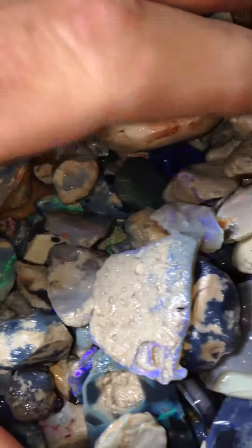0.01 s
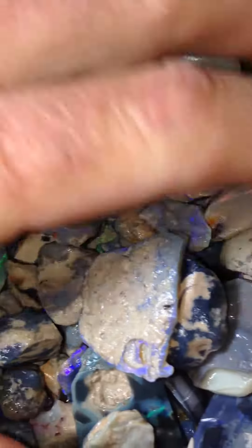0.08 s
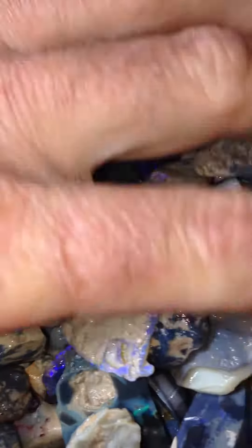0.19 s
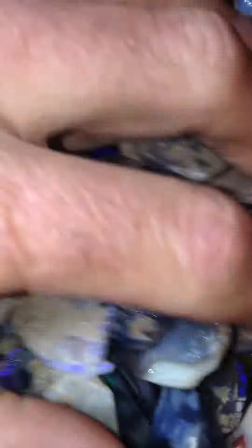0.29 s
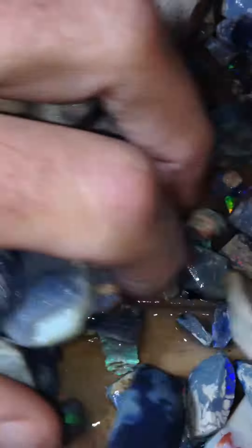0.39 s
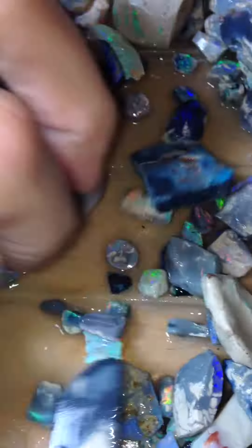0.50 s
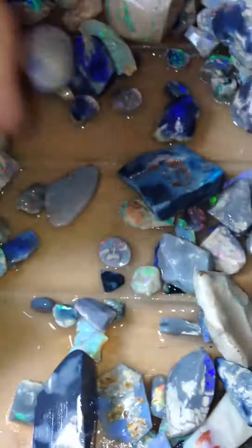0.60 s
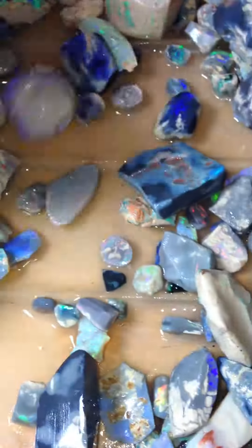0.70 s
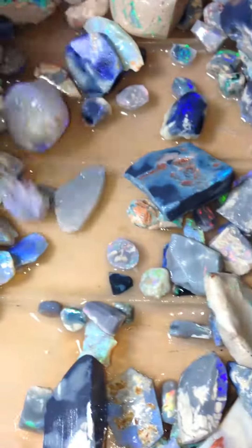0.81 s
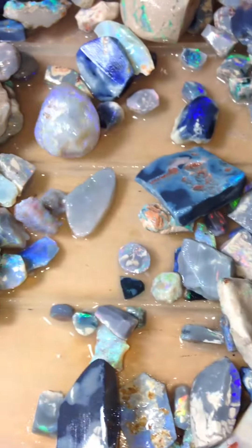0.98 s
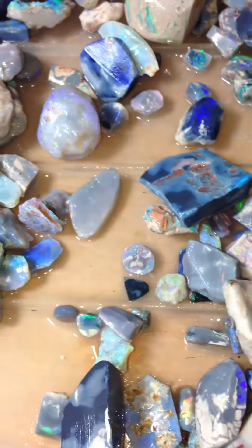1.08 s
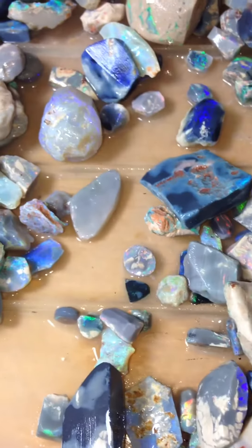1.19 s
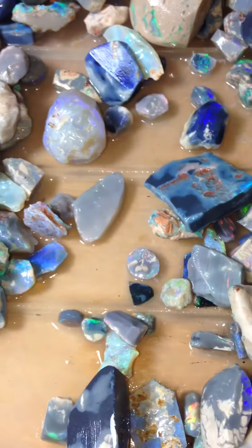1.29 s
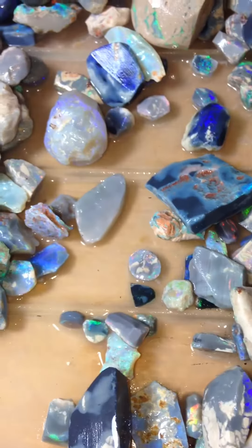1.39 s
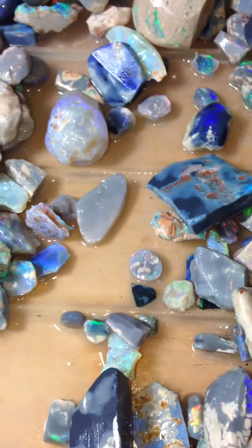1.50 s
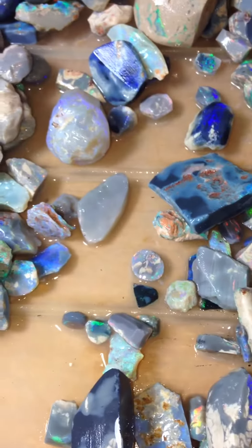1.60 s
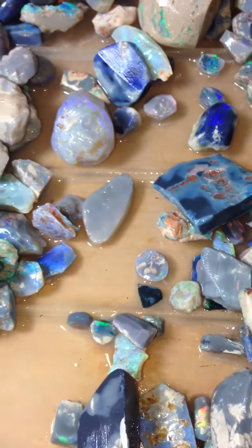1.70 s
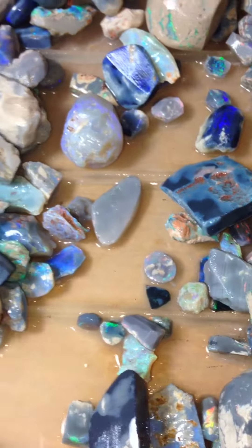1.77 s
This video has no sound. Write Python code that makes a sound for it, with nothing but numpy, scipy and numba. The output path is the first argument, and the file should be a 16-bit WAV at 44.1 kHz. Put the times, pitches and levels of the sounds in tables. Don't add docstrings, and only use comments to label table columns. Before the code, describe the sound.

Small hard stones clatter in a shallow tray, raked by hand, very close and fairly dry indoors. Faint rustling and ticks until 0.2 s, then a push swells into a dense, hard rattle at 0.35-0.6 s. Loose stones tumble on, with bright sharp clacks around 0.93-1.1 s, tiny high glassy rings and dull tray knocks. Sparser clicks follow, with a small flurry near 1.5 s, over faint room air and hum.

```python
import sys
import numpy as np
from scipy import signal
from scipy.fft import rfft, irfft
from scipy.io import wavfile
from scipy.ndimage import map_coordinates
from numba import njit

SR = 44100
rng = np.random.default_rng(int(sys.argv[2]) if len(sys.argv) > 2 else 0)


def nominal_scale(level):
    x = np.asarray(level, float) / 20
    return 10 ** x


def unload_audio(sound):
    columns = np.transpose(np.atleast_2d(sound))
    steps = np.round(np.clip(columns, -1, 1) * 32767)
    wavfile.write(sys.argv[1], SR, steps.astype(np.int16))


N = 79380

# (pitch [Hz], level [dB], time to fade 60 dB [s])
TRAY_MODES = [(131.8, -17.5, 0.17), (171.5, -19.5, 0.42), (280, -6, 0.021), (423, -11.5, 0.24),
              (596.5, -10.5, 0.19), (828, -2.5, 0.1), (1114, 4, 0.019), (1547, -4.5, 0.11),
              (1817, 5.5, 0.023)]
# (time [s], pitch [Hz], boost [dB])
PALM_HOLLOW = [(0, 1025, 10), (.2, 1010, 12.5), (.25, 1130, 16.5), (.29, 1580, 4.5), (.45, 1340, 11),
               (.55, 1180, 5.5), (.66, 900, 4)]
TRAY_DRIFT = 0.079
STONE_CYCLES, CYCLES_SCATTER = 26, 0.45


def unit(x):
    return x / np.sqrt(np.mean(x ** 2))


def read(table, hz):
    table = np.array(table)
    return np.interp(np.log(hz), np.log(table[:, 0]), table[:, 1])


@njit
def ring(at, hz, t60, size):
    out = np.zeros(N)
    for k in range(len(at)):
        turn = np.exp(2j * np.pi * hz[k] / SR - np.log(1000.) / (t60[k] * SR))
        z = size[k] + 0j
        start = max(int(at[k] * SR), 0)
        for j in range(start, min(start + int(t60[k] * SR), N)):
            out[j] += z.imag
            z *= turn
    return out


def strike(at, size, modes, drift=TRAY_DRIFT):
    hz, db, t60 = np.array(modes, float).T
    chance = rng.standard_normal((len(at), 2, len(hz)))
    mode_hz = hz * (1 + drift * chance[:, 0])
    mode_size = size[:, None] * nominal_scale(db + 1.46 * chance[:, 1])
    rows = np.broadcast_arrays(at[:, None], mode_hz, t60, mode_size)
    return ring(*(np.ascontiguousarray(r).ravel() for r in rows))


def walk(rate_hz):
    steps = rng.standard_normal(1000)
    return np.interp(np.arange(N) / SR * rate_hz, np.arange(len(steps)), steps)


def rustle():
    contacts = 7000
    clump_hz, clump_db = 91, 0.14
    ticks_db, drum_db = -1, -12
    dull_hz, soft_dull = 9000, 0.64
    palm_damp = 0.34
    # (pitch [Hz], level [dB])
    stones = [(700, 2), (1400, -4.5), (2200, -0.5), (3000, 2), (4200, -1), (5800, -0.6), (8500, -3),
              (15000, -12)]

    at = rng.random(contacts) * N / SR
    push_db, tilt_db, scatter_db = effort(at)
    steady = np.sqrt(np.mean(nominal_scale(push_db) ** 2))
    db = push_db + clump_db * walk(clump_hz)[(at * SR).astype(int)]
    db = db + scatter_db * (np.minimum(rng.exponential(size=contacts), 3.4) - 1.3)

    hz = 700 * (15500 / 700) ** rng.random((contacts, 3))
    t60 = STONE_CYCLES / hz * np.exp(CYCLES_SCATTER * rng.standard_normal(hz.shape))
    mode_db = db[:, None] + read(stones, hz) + patches(at, hz)
    mode_db = mode_db + tilt_db[:, None] * np.log2(hz / 2000)
    gentle_db = np.minimum(push_db + 10, 0)[:, None]
    mode_db = mode_db + soft_dull * gentle_db * np.maximum(np.log2(hz / dull_hz), 0)
    size = nominal_scale(mode_db) * np.sqrt(hz / t60)
    ticks = ring(np.repeat(at, 3), hz.ravel(), t60.ravel(), size.ravel())
    ticks = signal.sosfilt(signal.butter(2, 480, "high", fs=SR, output="sos"), ticks)

    s, _, palm_db = np.array(PALM_HOLLOW).T
    tap_db = db - palm_damp * np.interp(at, s, palm_db)
    taps = contacts // 5
    drum = strike(at[:taps], nominal_scale(tap_db[:taps]) * rng.choice([-1., 1.], taps), TRAY_MODES)
    return steady * (nominal_scale(ticks_db) * unit(ticks) + nominal_scale(drum_db) * unit(drum))


def effort(at):
    edge_s = 0.0062
    push_scatter_db, tumble_scatter_db = -1, -0.5
    # (time [s], level [dB], brightness [dB per octave])
    push = [(0, -31.5, -4.5), (0.042, -27.5, -1), (0.097, -26.5, -2), (.135, -43, -2.5), (.18, -41, -3),
            (.21, -25.5, 0), (0.345, -20, -3), (0.368, -11, 0.7), (.5, -13, 2.1), (.58, -17, -0.1),
            (.71, -24, 0.7), (.8, -22.5, 1.8), (1.04, -29, 2.5), (1.13, -26, 1.8), (1.27, -30.5, -3),
            (1.39, -39.5, -3), (1.46, -28.5, -0.3), (1.8, -32.5, -3.5)]
    # (start [s], length [s], level [dB], brightness [dB per octave])
    tumbles = [(0.243, 0.022, -20, -0.5), (0.301, 0.0091, -20.5, 3.5), (0.349, 0.0087, -16, 3),
               (0.37, 0.02, -19, 4), (0.427, 0.022, -16.5, -2), (0.199, 0.0075, -32, -5),
               (0.331, 0.011, -25.5, 13), (0.617, 0.015, -18, 1.5), (0.778, 0.026, -24.5, -0.5),
               (0.875, 0.011, -25, 4.5), (0.915, 0.004, -27, 7), (0.932, 0.0056, -24, -3),
               (0.945, 0.035, -22, 2.5), (0.997, 0.011, -17.5, -1), (1.02, 0.039, -21.5, 1.2),
               (1.082, 0.021, -21, -2.5), (1.146, 0.01, -24, 0.5), (1.164, 0.0097, -20.5, 0.8),
               (1.196, 0.017, -31, 9.5), (1.227, 0.0086, -25.5, 0.7), (1.332, 0.012, -29, -4.5),
               (1.442, 0.0042, -24, -2), (1.458, 0.015, -29, 2.5), (1.482, 0.005, -27, 2.5),
               (1.522, 0.034, -24, 0.8), (1.592, 0.023, -29.5, -1.5), (1.663, 0.0087, -23.5, -4),
               (1.77, 0.012, -27, -3)]

    s, push_db, push_tilt_db = np.array(push, float).T
    power = nominal_scale(np.interp(at, s, push_db)) ** 2
    tilt_db = np.interp(at, s, push_tilt_db) * power
    scatter_db = push_scatter_db * power
    for start, length, tumble_db, tumble_tilt_db in tumbles:
        rise = (at - start) / edge_s + 1
        fall = (start + length - at) / edge_s / 2 + 1
        extra = (nominal_scale(tumble_db) * np.clip(np.minimum(rise, fall), 0, 1)) ** 2
        power = power + extra
        tilt_db = tilt_db + extra * tumble_tilt_db
        scatter_db = scatter_db + extra * tumble_scatter_db
    return 10 * np.log10(power), tilt_db / power, np.clip(scatter_db / power, 0, 6)


def patches(at, hz):
    patch_hz, patch_db = 22.34, 0.54
    palm_octaves, group_octaves = 0.29, 0.12
    # (middle [s], length [s], pitch [Hz], boost [dB])
    grinds = [(0.4, 0.039, 2400, 1), (0.392, 0.014, 2000, -3), (0.45, 0.05, 8100, 2.5),
              (0.364, 0.026, 1200, 1), (0.498, 0.018, 1160, 7.5), (0.488, 0.033, 3140, 5),
              (.545, 0.016, 1180, 16), (0.581, 0.027, 5760, 10), (.632, 0.016, 3900, -2),
              (0.289, 0.021, 1500, 14), (0.64, 0.038, 6400, 9), (1.17, 0.011, 5100, 10),
              (1.46, 0.016, 2070, 13), (1.545, 0.036, 3980, 9.5)]

    busy = rng.standard_normal((200, 40))
    place = np.broadcast_arrays(at[:, None] * patch_hz, 2 * (hz / 100) ** 0.5)
    boost_db = patch_db * map_coordinates(busy, place, order=1)
    for mid, length, pitch_hz, db in grinds:
        late = (at[:, None] - mid) / length
        off = np.log2(hz / pitch_hz) / group_octaves
        boost_db = boost_db + db * np.exp(-2 * late ** 2 - off ** 2 / 2)
    s, palm_hz, palm_db = np.array(PALM_HOLLOW, float).T
    away = np.log2(hz / np.interp(at, s, palm_hz)[:, None]) / palm_octaves
    return boost_db + np.interp(at, s, palm_db)[:, None] * np.exp(-away ** 2 / 2)


def clacks():
    side_modes_db, crack_db, thud_db = -11, -3.5, -26
    crack_s, crack_octaves = 0.0022, 0.8
    # (time [s], peak level [dB],
    # stone pitch [Hz])
    early = [(0.2128, -18, 2080), (0.2319, -13, 2230), (0.251, -18, 1810), (0.3042, -7.5, 2410),
             (0.6233, -8, 3120), (0.7006, -13.5, 2120), (0.7274, -12, 4640), (0.9203, -24.5, 7900),
             (0.9792, -4, 7900), (1.023, -17, 4700), (1.048, -3.5, 6100), (1.103, -18, 2140)]
    bright = [(0.019, -17, 13570), (0.1268, -27, 6700), (0.1333, -29, 6600), (0.1551, -21, 6300),
              (0.1635, -15, 9900), (0.3662, -8, 6360), (0.6004, -6.5, 5550), (0.627, -11, 5700),
              (0.7936, -8.5, 7700), (0.8822, -9, 6850), (0.8941, -5, 8100), (1.0255, -3, 8400),
              (1.0342, -7, 5860), (1.0828, -5, 8500), (1.092, -4, 10300), (1.2942, -13, 5500),
              (1.405, -24, 8500), (1.428, -15, 7000), (1.4827, -11, 8800), (1.505, -2.5, 9300),
              (1.6395, -13.5, 9360), (1.7059, -24, 6500), (1.722, -18, 6800), (1.7837, -11, 11100)]
    late = [(1.1646, -19, 5200), (1.1997, -12, 1960), (1.231, -8, 3540), (1.284, -16, 2100),
            (1.3551, -19.5, 2470), (1.4407, -9, 4160), (1.455, -11.5, 1780), (1.4829, -11, 5700),
            (1.5216, -6.5, 5860), (1.532, -16, 1890), (1.546, -11.5, 4400), (1.5496, -24, 5770),
            (1.5953, -19, 5270), (1.6585, -16.5, 2150), (1.7369, -19.5, 2090), (1.7574, -15.5, 2770),
            (1.7856, -13.5, 1960)]
    # (time [s], peak level [dB], stone pitch [Hz])
    others = [
        (.9282, 1, 8500),
        (.9282, -5, 4750),
        (1.0107, -2, 9800),
        (1.0104, -9, 1900),
        (.6015, -6, 2330),
              (.001, -17.5, 9000), (0.0327, -18, 1980), (.044, -15.5, 8540), (0.099, -27, 6040),
              (0.1563, -28, 1500), (.163, -20, 1087), (.195, -25.5, 950), (0.2995, -10, 9000),
              (0.3295, -12, 2800), (0.348, -10, 1790), (.3742, -19, 3400), (.378, 0, 3230),
              (0.383, -5, 2600), (0.3903, -2, 2950), (.4375, -4, 1770), (0.4637, -10, 4400),
              (0.6306, -2.5, 3320), (0.6474, -6.5, 4130), (0.7936, -11.5, 3800), (0.8193, -10.5, 2940),
              (0.9327, -14, 4000), (0.9796, -14, 4500), (1.0675, -12.5, 2080), (1.1297, -13, 9500),
              (1.148, -15, 6850), (1.3416, -20, 4400), (1.3662, -28, 5500), (1.4541, -12, 6030),
              (1.641, -21, 1900), (1.6893, -27, 1680), (1.7365, -17, 6890), (1.789, -15, 4000)]

    at, db, hz = np.array(early + late + bright + others, float).T
    chance = rng.standard_normal((len(at), 8))
    side = np.array([0, 1, 1, 1])
    pitch = np.clip(hz[:, None] * np.exp(0.432 * chance[:, :4] * side), 900, 15000)
    size = nominal_scale(db[:, None] + side_modes_db * side - 6)
    t60 = STONE_CYCLES / pitch * np.exp(CYCLES_SCATTER * chance[:, 4:])
    out = ring(np.repeat(at, 4), pitch.ravel(), t60.ravel(), size.ravel())

    t = np.arange(SR // 40) / SR
    bins_hz = np.arange(len(t) // 2 + 1) * SR / len(t) + 1
    band = np.exp(-(np.log2(bins_hz / hz[:, None]) / crack_octaves) ** 2 / 2)
    crack = irfft(rfft(rng.standard_normal((len(at), len(t)))) * band, len(t))
    crack = crack / crack.std(axis=1, keepdims=True) * np.exp(-t / crack_s)
    crack = crack * nominal_scale(db + crack_db - 5)[:, None]
    where = (at[:, None] * SR).astype(int) + np.arange(len(t))
    np.add.at(out, np.clip(where, 0, N - 1), crack)
    out = signal.sosfilt(signal.butter(2, 11500, fs=SR, output="sos"), out)
    return out + strike(at, nominal_scale(db + thud_db) / 2, TRAY_MODES[3:])


def thuds():
    # (time [s], peak level [dB], strongest tray pitch [Hz])
    drops = [(0.249, -23, 1060), (.43, -25, 125.5), (.54, -27, 118), (.701, -20.5, 826), (.765, -25.5, 423),
             (.807, -22, 407), (.825, -23, 784), (.912, -25, 757), (.955, -23, 784), (.972, -21, 840),
             (1.002, -21, 405), (1.0108, -22.5, 870), (1.048, -22.5, 427), (1.085, -25, 910),
             (1.105, -22.5, 980), (1.168, -21, 1000), (1.234, -24.5, 880), (1.25, -35.5, 123),
             (1.458, -27, 495), (1.455, -34, 133), (1.506, -24, 800), (1.54, -30, 800), (1.604, -25, 697),
             (1.666, -28.5, 600), (1.77, -40, 860)]
    at, db, hz = np.array(drops, float).T
    t60 = 0.075 * (400 / hz) ** 1.03
    rest_db = -6
    return ring(at, hz, t60, nominal_scale(db)) + strike(at, nominal_scale(db + rest_db), TRAY_MODES[3:7])


def glassy_stone():
    rock_db, nudge_db = -2.5, -31
    # (time [s], peak level [dB])
    rocks = [(0.8844, -14), (0.9587, -12), (1.018, -14), (1.0814, -16), (1.0919, -14), (1.1374, -20),
             (1.1478, -7.5), (1.2067, -15), (1.2194, -17.5), (1.5212, -24), (1.551, -27), (1.6, -36),
             (1.757, -36)]
    # (pitch [Hz], level [dB], time to fade 60 dB [s])
    glassy_modes = [(14820, -4.5, 0.077), (15300, -10, .025), (14800, -7, 0.022)]
    at, db = np.array(rocks, float).T
    nudges = rng.random(160) * N / SR
    at = np.append(at, nudges)
    db = np.append(db + rock_db, effort(nudges)[0] + nudge_db)
    return strike(at, nominal_scale(db), glassy_modes, drift=0.003)


def hum():
    hz = 126.5 * (1 + 0.05 * walk(17))
    return nominal_scale(-52.5 + 3.2 * walk(7.5)) * np.sin(2 * np.pi * np.cumsum(hz) / SR)


def air():
    # (pitch [Hz], level [dB per Hz])
    air_spectrum = [(30, 1), (60, 20), (125, 6), (250, 5), (900, -1.5), (2500, -1), (7000, -63),
                    (13000, -52)]
    hz = np.maximum(np.arange(N // 2 + 1) * SR / N, 1)
    noise = irfft(rfft(rng.standard_normal(N)) * nominal_scale(read(air_spectrum, hz)), N)
    return nominal_scale(-47.5) * unit(noise)


def fading_noise(t60, db):
    t = np.arange(SR // 3) / SR
    return nominal_scale(db) * unit(rng.standard_normal(len(t)) * nominal_scale(-60 * t / t60)) / np.sqrt(len(t))


def scene():
    stones = rustle() + clacks() + thuds() + glassy_stone()
    near = fading_noise(0.078, -14.5)
    far = signal.lfilter([0.5], [1, -0.5], fading_noise(0.66, -38))
    echoes = signal.fftconvolve(stones, near + far)[:N]
    return (stones + echoes + air() + hum())[None]


def band_limit(x):
    return signal.sosfilt(signal.butter(12, 16650, fs=SR, output="sos"), x)


def record(dry):
    x = signal.sosfilt(signal.butter(2, 116, "high", fs=SR, output="sos"), dry)
    x = np.tanh(1.013 * x) / 1.185
    x = signal.sosfilt(signal.ellip(8, 0.3, 70, 15400, fs=SR, output="sos"), x)
    return band_limit(x)


dry = scene()
out = record(dry)
unload_audio(out)
```